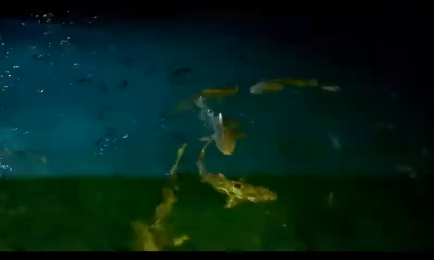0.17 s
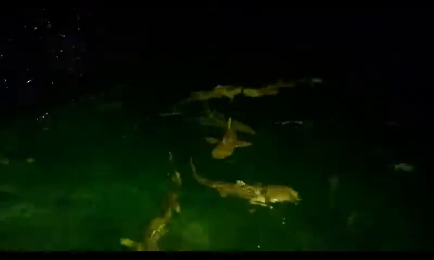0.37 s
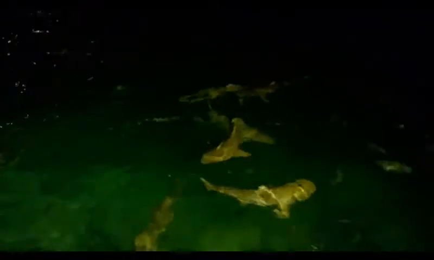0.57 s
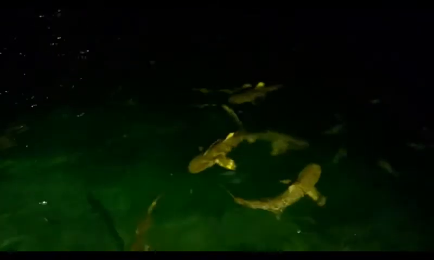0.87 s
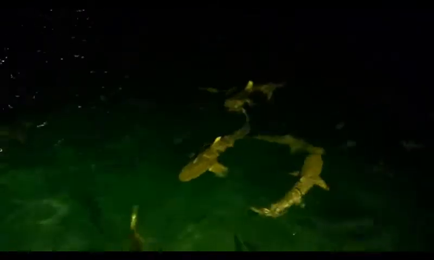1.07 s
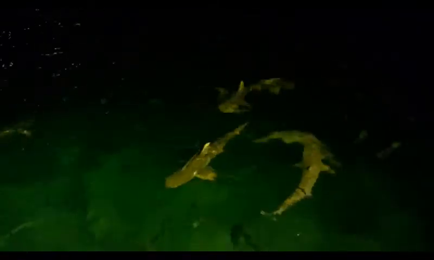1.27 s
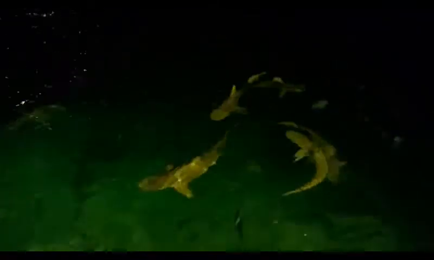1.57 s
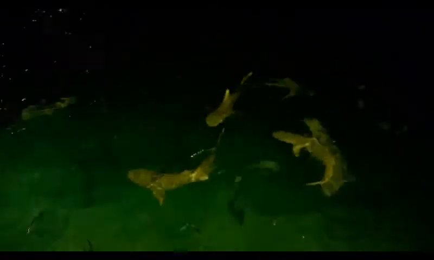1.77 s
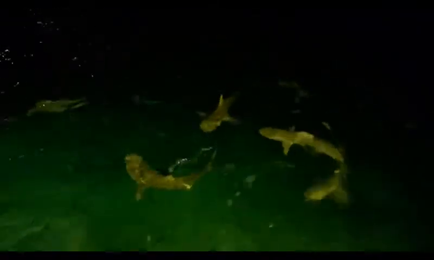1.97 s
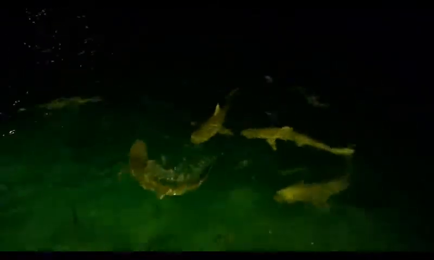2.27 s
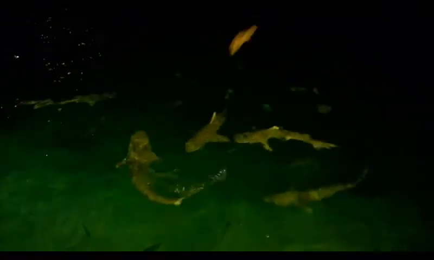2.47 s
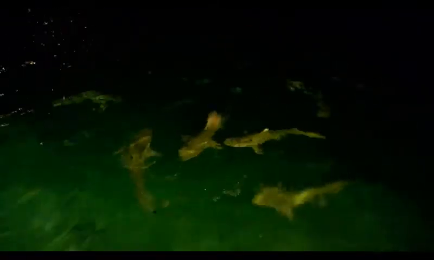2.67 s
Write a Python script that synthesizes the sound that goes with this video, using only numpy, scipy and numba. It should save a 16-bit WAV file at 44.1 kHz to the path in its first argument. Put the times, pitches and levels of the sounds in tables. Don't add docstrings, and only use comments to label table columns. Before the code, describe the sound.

Wind rumbles and buffets a phone microphone, strongest on the left, with hard thuds in the first half; faint wavelets fizz right, then a fish churns and bubbles ahead before a scrap slaps the water.

```python
import sys
import numpy as np
from scipy import signal
from scipy.fft import rfft, irfft
from scipy.io import wavfile
from scipy.ndimage import uniform_filter1d
from numba import njit

SR = 44100
rng = np.random.default_rng(int(sys.argv[2]) if len(sys.argv) > 2 else 0)


def amp(db):
    return 10 ** (np.asarray(db, float) / 20)


def write(x):
    x = np.atleast_2d(x).T
    wavfile.write(sys.argv[1], SR, np.round(np.clip(x, -1, 1) * 32767).astype(np.int16))


N = 123921
T = np.arange(N) / SR
FFT_SIZE = 2 ** 17
RIGHT_LAG, AHEAD_LAG = 14, -2


@njit
def svf(x, hz, damp):
    low, band = np.empty(len(x)), np.empty(len(x))
    b, l = 0., 0.
    for i in range(len(x)):
        g = np.tan(np.pi * hz[i] / SR)
        v = (b + g * (x[i] - l)) / (1 + g * (g + damp))
        low[i] = l + g * v
        band[i] = damp * v
        b, l = 2 * v - b, l + 2 * g * v
    return low, band


def unit(x):
    return x / np.sqrt(np.mean(x ** 2))


def near(t, s):
    return slice(max(int((t - s) * SR), 0), int((t + s) * SR))


def walk(rate):
    hold = int(SR / rate)
    steps = rng.standard_normal(size=2048)[np.arange(N) // hold]
    return 1.055 * uniform_filter1d(uniform_filter1d(steps, hold), hold)


def colour(x, tone, lo=0, hi=1e9):
    f = np.maximum(np.arange(FFT_SIZE // 2 + 1) * SR / FFT_SIZE, 1)
    hz, db = np.array(tone).T
    octaves_below = np.maximum(np.log2(hz[0] / f), 0)
    shape = amp(np.interp(np.log(f), np.log(hz), db) - 12.3 * octaves_below)
    band = np.sqrt(np.abs(1 / (1 + (lo / f) ** 8) - 1 / (1 + (hi / f) ** 8)))
    return irfft(rfft(x, FFT_SIZE) * shape * band, FFT_SIZE)[:N]


def place(x, lag, pan_db, alike):
    share = np.clip(alike, 0, 2 / 3)
    common = np.array([np.roll(x[0], lag), x[0]])
    pan = amp([[pan_db / 2], [-pan_db / 2]])
    return (np.sqrt(share) * common + np.sqrt(1 - share) * x[1:]) * pan


def spray(tone, spiky_db):
    pops = rng.standard_normal((3, N))
    pops = pops * amp(spiky_db * np.minimum(rng.exponential(size=(3, N)), 6))
    pops = pops * amp(2.0 * walk(150))
    return np.array([unit(colour(p, tone)) for p in pops])


def swells(rows, edge=2.14):
    power = np.full(N, 1e-9)
    for t, s, db in rows:
        k = near(t, 2 * s)
        power[k] += amp(2 * db) * np.exp(-np.abs((T[k] - t) / (.45 * s)) ** edge)
    return power


def bursts(rows, shower):
    env = np.zeros(N)
    for t, db, t60 in rows:
        k = near(t, t60)
        attack = np.clip((T[k] - t) / 0.00057, 0, 1)
        env[k] += amp(db - 60 * np.abs(T[k] - t) / t60) * attack
    return env * shower


# frequency in Hz, level in dB per Hz.
SEA_TONE = [(300, 2), (700, -4), (1200, -8), (1600, -11), (2800, -22.5), (4900, -21), (7500, -34.5),
            (15500, -35)]


def far_sea():
    level_db = -57.5 + 1.2 * walk(2.3)
    return place(amp(level_db) * spray(SEA_TONE, 0.49), AHEAD_LAG, 6.3, 0.14)


# frequency in Hz, level in dB per Hz.
FIZZ_TONE = [(2200, -18.5), (3200, -1), (4400, -4.5), (5700, 1.5), (8500, -2), (10000, -3.5), (13000, -5.5),
             (15500, -7)]
# centre in seconds, length in seconds, level in dB.
FIZZ = [(.0, .04, -73), (.05, 0.058, -58.5), (.095, 0.046, -59.5), (.185, 0.11, -58.5), (.66, 0.065, -69.5),
        (.75, 0.056, -65.5), (.805, 0.068, -65.5), (.93, 0.11, -63), (1.045, 0.073, -61.5),
        (1.16, 0.11, -69), (1.24, 0.13, -61.5), (1.34, 0.076, -63.5), (1.43, 0.15, -61),
        (1.55, 0.076, -64.5), (1.73, 0.07, -64), (1.87, .05, -72), (2.52, 0.05, -72), (2.6, 0.11, -76),
        (2.71, 0.11, -65)]


def wavelet_fizz(shower):
    return place(np.sqrt(swells(FIZZ)) * shower, RIGHT_LAG, -6.5, 0.17)


# start in seconds, peak level in dB.
DROPS = [(0.092, -41), (0.169, -34), (0.207, -49), (2.11, -43), (2.142, -36), (2.306, -49.5),
         (2.664, -42.5), (2.7, -44.5), (2.712, -42), (2.725, -44), (2.739, -46)]


def drop_ticks(shower):
    ticks = [(t, db - 3.5, .007) for t, db in DROPS]
    return place(bursts(ticks, shower[::-1]), RIGHT_LAG, -4.0, 0.35)


# centre in seconds, length in seconds, level in dB.
SWIRL = [
    (.19, 0.042, -58),
    (1.76, 0.089, -66),
    (2.03, 0.2, -64),
    (2.2, .12, -60.5),
    (2.32, 0.077, -59),
    (2.45, .05, -65.5),
    (2.62, 0.25, -66),
]
# frequency in Hz, level in dB per Hz.
SWIRL_TONE = [(700, 6), (1500, 0.5), (2500, -5), (4000, -9.5), (6500, -10.5), (10000, -16.5), (15500, -29)]


def fish_swirl():
    return place(np.sqrt(swells(SWIRL)) * spray(SWIRL_TONE, 4.7), AHEAD_LAG, 4.7, 0.53)


# centre in seconds, length in seconds, level in dB.
CHURN = [
    (2.11, 0.02, -68),
    (2.15, 0.072, -55),
    (2.2, 0.081, -62),
    (2.26, 0.083, -64.5),
]
# frequency in Hz, level in dB per Hz.
CHURN_TONE = [(900, -2), (2000, 3.5), (3200, 2), (5000, 6.5), (7500, 2.5), (10000, 3), (13000, 1),
              (15500, -3)]


def fish_churn():
    return place(np.sqrt(swells(CHURN)) * spray(CHURN_TONE, 1.8), AHEAD_LAG, 1.5, 0.25)


# centre in seconds, pitch in Hz, level in dB, length in seconds.
BUBBLES = [(.168, 871, -60.5, 0.017), (0.049, 1920, -64, .005), (0.053, 3300, -60, .003),
           (0.121, 1860, -61.5, .006), (.125, 1410, -62, .012), (.183, 4900, -58, 0.0013),
           (0.205, 1750, -60, 0.0072), (0.236, 2240, -66, .012), (1.007, 1730, -55.5, .003),
           (1.722, 430, -44.5, 0.043), (1.742, 794, -62, 0.04), (2.003, 483, -52, .05),
           (2.01, 970, -54.5, 0.03), (2.036, 1170, -57, .008), (2.05, 3830, -70, 0.0045),
           (2.068, 474, -46, 0.014), (2.08, 1100, -57, 0.016), (2.105, 1900, -65, .014),
           (2.154, 3050, -59, 0.008), (2.18, 1820, -58, .006), (2.184, 3030, -63, 0.0057),
           (2.228, 2000, -64, .005), (2.266, 1730, -57, 0.008), (2.294, 2450, -57, .005),
           (2.33, 2490, -58, .002), (2.468, 3050, -67, .002), (2.52, 6560, -56, 0.0022),
           (2.601, 429, -50, 0.028), (2.314, 674, -56.5, .03), (2.449, 3700, -62, .0009),
           (2.762, 4470, -33.5, 0.0015), (2.765, 7300, -39, .0012), (2.7945, 5600, -45, .002)]


def bubbles():
    out = np.zeros(N)
    wobble, flutter = .04 * walk(250), amp(4.5 * walk(300))
    when, size, quiet = rng.random(size=(600, 3)).T
    busy = np.cumsum(swells(SWIRL))
    starts = np.interp(when, busy / busy[-1], T)
    levels_db = -57 - 12 * quiet - 13 * size
    small = zip(starts, 500 * 2 ** (2.6 * size), levels_db, .007 - .005 * size)
    for t, hz, db, s in BUBBLES + list(small):
        k = near(t, 2 * s)
        u = T[k] - t
        slide = 0.0323 * np.log2(hz / 1000.) * u / s
        phase = 2 * np.pi * np.cumsum(hz * (1 + slide + wobble[k])) / SR
        out[k] += amp(db) * np.exp(-(u / (0.69 * s)) ** 2) * np.sin(phase)
    return np.array([out, np.roll(out, 3) * amp(-10.5)]) * flutter * amp(5.5)


# start in seconds, level in dB, t60 in seconds.
SPLASH = [
    (2.7598, -26, 0.011),
    (2.763, -38.5, 0.0077),
    (2.7655, -36.5, 0.015),
    (2.761, -48.5, 0.67),
]
# frequency in Hz, level in dB per Hz.
SPLASH_TONE = [(1000, -2.5), (2200, -4.5), (3100, -10), (4300, -0.5), (5600, -3.5), (7000, -4),
               (8600, -5.5), (15500, -11.5)]


def scrap_splash():
    return place(bursts(SPLASH, spray(SPLASH_TONE, 1.9)), AHEAD_LAG, 2.5, 0.85)


# frequency in Hz, level in dB.
RIGHT_PORT = [(20, 15), (1200, -3.5), (2300, -8.5), (3500, -1.5), (8000, -0.5), (9800, -13), (11500, -0.5),
              (16000, -0.5)]


def through_ports(water):
    left, right = water
    return np.array([left, colour(right, RIGHT_PORT)])


def rumble(tone, flicker_db=2.5, shared_db=4.5):
    noise, shared = rng.standard_normal(N), walk(24.967)
    total = np.zeros(N)
    for lo in 15 * 2. ** np.arange(8):
        level_db = shared_db * np.tanh(shared) + flicker_db * np.tanh(walk(14))
        total += amp(level_db) * colour(noise, tone, lo, 2 * lo)
    return unit(total)


def buffets(rows, full_db, corner_hz, thump_db, skirt):
    power = swells(rows, edge=3.06)
    boosted = [(t, s, db - 8 * np.log2(s / 0.029)) for t, s, db in rows]
    weighted = uniform_filter1d(power * swells(boosted, edge=5.0), 400)
    held = np.abs(weighted + 1e-17) / uniform_filter1d(power, 400)
    octaves = 0.04 * (10 * np.log10(held) - full_db)
    hz = np.clip(corner_hz * 2 ** octaves, 100, 3000)

    roar = rng.standard_normal(N) / np.sqrt(hz / SR) * amp(1.7 * walk(180))
    roar = svf(roar, 0.53 * hz, 0.59)[1]
    roar = svf(roar, hz, 0.98)[0]
    roar = svf(roar, skirt * hz, 2.2)[0]
    roar = roar / (uniform_filter1d(roar ** 2, size=500) + 1e-9) ** 0.27

    thump = svf(rng.standard_normal(N), np.full(N, 100.), 1.5)[1]
    thump = unit(svf(thump, np.full(N, 230.), 1.2)[0])
    thump = thump * np.sqrt(uniform_filter1d(power, 500))
    return 0.74 * roar * np.sqrt(power) + amp(thump_db) * thump


# centre in seconds, turning rate in Hz, peak level in dB.
EDDIES = [(0.103, 44, -15), (0.151, 133, -14), (.172, 48.4, -15.5), (.195, 151, -13), (.225, 202, -22.5),
          (0.306, 103, -10.5), (0.425, 69, -13.5), (.56, 600, -29), (.596, 138, -13), (0.6058, 530, -8.5),
          (0.6091, 335, -15.5), (.6145, 670, -7.5), (0.6142, 224, -9), (0.675, 70, -11.5), (.762, 605, -39),
          (0.7987, 418, -10), (.8017, 740, -18), (0.8027, 209, -9), (0.8041, 457, -11), (.81, 60, -11),
          (0.813, 150, -6.5), (0.8142, 413, -16), (.891, 540, -36), (.98, 80.6, -12), (1.148, 149, -10),
          (1.1635, 280, -10.5), (1.1671, 80.6, -10.5), (1.1709, 410, -13), (1.185, 756, -24),
          (1.186, 182, -13.5), (1.203, 85, -9), (1.25, 586, -29), (1.2936, 226, -7), (1.2996, 253, -14),
          (1.305, 537, -14.5), (1.311, 343, -10.5), (1.32, 634, -23.5), (1.3434, 410, -14.5),
          (1.362, 197, -15), (1.391, 80, -17), (1.4333, 162, -8), (1.4596, 220, -7.5), (1.4631, 436, -17),
          (1.4733, 514, -18.5), (1.488, 244, -16.5), (1.568, 132, -13), (1.689, 61, -8), (1.831, 60, -13),
          (2.1247, 209, -12), (2.153, 74, -12.5), (2.665, 60, -14.5), (2.768, 113, -12.5),
          (2.8105, 405, -18)]


def eddies():
    out = np.zeros(N)
    start_turns = rng.random(size=len(EDDIES))
    for (t, hz, db), start in zip(EDDIES, start_turns):
        k = near(t, 3 / hz)
        turns = (T[k] - t) * hz
        env = np.exp(-np.abs(turns / .4) ** 1.65 / 2)
        out[k] += amp(db) * env * np.sin(2 * np.pi * (turns + start))
    return np.array([out, 0 * out])


# centre in seconds, length in seconds, level in dB.
LEFT_BUFFETS = [(0.432, 0.065, -29.5), (0.557, 0.033, -32.5), (.611, 0.0161, -19), (0.662, 0.014, -27.5),
                (0.81, 0.025, -18.5), (0.902, 0.037, -29), (0.969, 0.031, -30), (1.169, 0.021, -21.5),
                (1.195, 0.021, -26.5), (1.258, 0.035, -34), (1.304, 0.045, -19.5), (1.357, 0.03, -20),
                (1.43, 0.037, -26.5), (1.47, 0.033, -22), (1.561, 0.052, -32), (1.683, 0.022, -38),
                (2.128, 0.025, -29.5)]
RIGHT_BUFFETS = [(0.46, 0.051, -35.5), (0.508, 0.018, -42), (.555, 0.017, -42), (0.578, 0.016, -37.5),
                 (0.699, 0.054, -39), (0.763, 0.014, -42.5), (0.853, 0.032, -37.5), (0.913, 0.017, -42.5),
                 (1.019, 0.034, -44.5), (1.174, 0.019, -37), (1.235, 0.036, -35.5), (1.56, 0.058, -43.5),
                 (1.709, 0.038, -48.5), (2.11, 0.049, -48)]
# level of a full buffet in dB, its corner in Hz, thump in dB,
# rumble offset in dB, second corner as a multiple of the first.
PORTS = [
    (-17, 630, 0.5, 5., 1.6),
    (-35, 837, 7, -13, 3.),
]
# time in seconds, level in dB.
WIND = [(0, -24.5), (.08, -33.5), (.13, -19), (.24, -23.5), (.45, -26.5), (.68, -25.5), (.75, -29.5),
        (.95, -33), (1.25, -23), (1.5, -27.5), (1.65, -26.5), (1.77, -29.5), (1.84, -24), (1.93, -32.5),
        (2.15, -27.5), (2.5, -31), (2.72, -28), (2.81, -20.5)]
# frequency in Hz, level in dB per Hz.
RUMBLE_TONES = [
    [(25, 1), (60, -3), (85, -11), (170, -19.5), (340, -36), (700, -46), (1400, -64), (2800, -80.5)],
    [(22, 0), (60, 6.5), (85, 8), (170, -2), (340, -18), (700, -21.5), (1400, -99.5), (2800, -41.5)],
]


def wind():
    strength = amp(np.interp(T, *np.array(WIND).T)) * amp(28.5)
    heard = []
    for rows, port, tone, grip in zip((LEFT_BUFFETS, RIGHT_BUFFETS), PORTS, RUMBLE_TONES, (.8, .3)):
        full_db, corner_hz, thump_db, rumble_db, skirt = port
        low = strength ** grip * amp(-27 + rumble_db) * rumble(tone)
        heard.append(low + buffets(rows, full_db, corner_hz, thump_db, skirt))
    return np.array(heard)


def scene():
    shower = spray(FIZZ_TONE, 1.7)
    water = far_sea() + drop_ticks(shower) + bubbles()
    water = water + amp(3) * (wavelet_fizz(shower) + fish_swirl() + fish_churn() + scrap_splash())
    return through_ports(water) + eddies() + wind()


def band_limit(x):
    return signal.sosfilt(signal.butter(12, 15810, fs=SR, output="sos"), x)


def record(dry):
    low_cut = signal.butter(2, 22., "high", fs=SR, output="sos")
    cut = signal.sosfilt(low_cut, dry * np.minimum(T / .005, 1))
    mix = np.tanh(cut / 1.203) * 1.391
    return band_limit(mix)


dry = scene()
out = record(dry)
write(out)
```